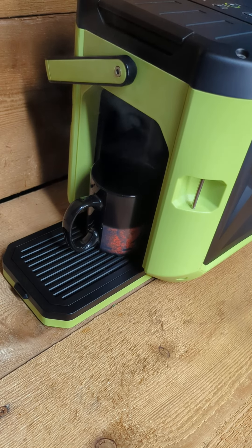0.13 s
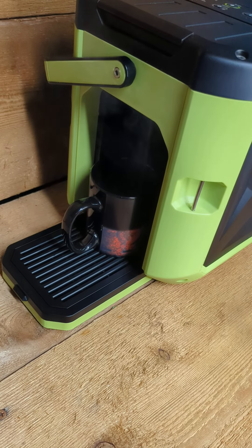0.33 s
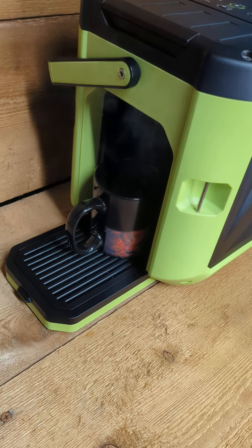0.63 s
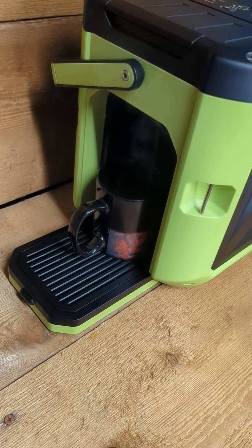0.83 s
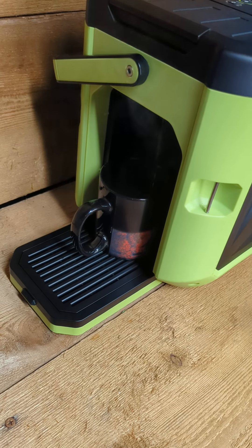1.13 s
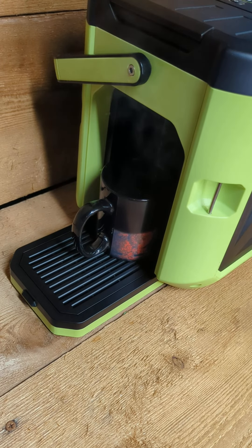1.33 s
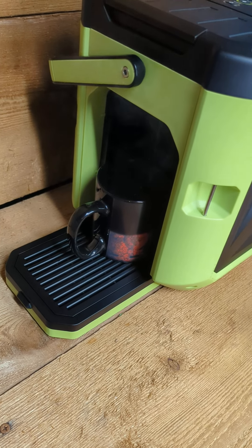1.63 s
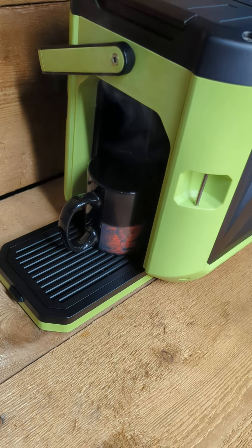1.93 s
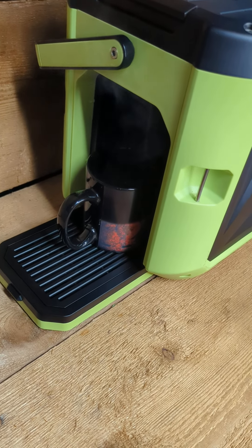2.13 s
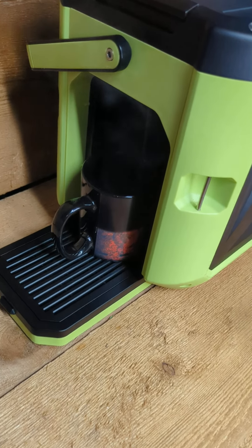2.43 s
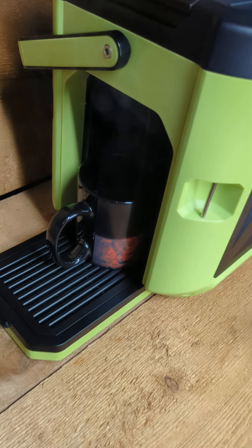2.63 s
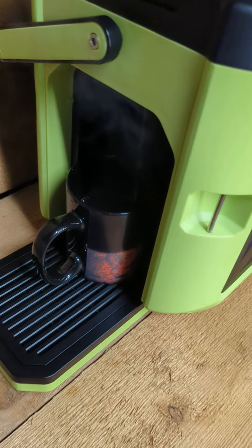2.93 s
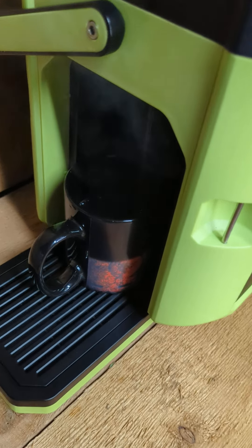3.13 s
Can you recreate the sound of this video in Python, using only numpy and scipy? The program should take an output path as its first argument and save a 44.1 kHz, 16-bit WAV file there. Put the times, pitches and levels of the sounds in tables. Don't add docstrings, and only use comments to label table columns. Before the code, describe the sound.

Close up in a wooden kitchen nook, rapid uneven drops plop and tick into a mug, thinning after the middle, then ending with louder plops; steady hum, faint whine and a brief steam hiss behind.

```python
import sys
import numpy as np
from scipy import signal
from scipy.fft import rfft, irfft
from scipy.io import wavfile
from scipy.ndimage import uniform_filter1d

SR = 44100
rng = np.random.default_rng(int(sys.argv[2]) if len(sys.argv) > 2 else 0)


def int16_out(signal):
    q = np.round(np.clip(np.atleast_2d(signal).T, -1, 1) * 32767)
    wavfile.write(sys.argv[1], SR, q.astype(np.int16))


def level_to_linear(level):
    exponent = np.asarray(level, float) / 20
    return 10 ** exponent


N = 145089
LEFT_LEAD_S = 0.000137


def evened(x):
    return x / np.sqrt(np.mean(x ** 2) + 1e-20)


def read(points, hz):
    f, value = np.transpose(points)
    return np.interp(np.log(hz + 1), np.log(f + 1), value)


def level_over_time(points):
    return level_to_linear(np.interp(np.arange(N) / SR, *np.transpose(points)))


def add(mix, s, sound):
    part = mix[..., max(round(s * SR), 0):][..., :sound.shape[-1]]
    part += sound[..., :part.shape[-1]]


def resonate(x, hz, width_hz):
    return signal.lfilter(*signal.iirpeak(min(hz, SR / 2.2), hz / width_hz, SR), x)


def slow(top_hz):
    t = np.arange(0, N + 64, 64) / SR
    wave = np.zeros(len(t))
    for f in np.geomspace(top_hz / 10, top_hz, num=16):
        wave += np.sin(2 * np.pi * (f * t + rng.random())) / np.sqrt(f)
    return np.interp(np.arange(N) / SR, t, evened(wave))


# (frequency [Hz], left-right likeness [-1 to 1])
LIKENESS = [(25, .75), (60, 1), (250, 0.71), (640, 0.4), (1400, 0.05), (3000, 0.3), (6000, .4),
            (15000, 0.35)]


def hiss(tone, patchy_db):
    frames, hz = N // 256 + 5, np.fft.rfftfreq(1024, 1 / SR)
    a, b, c, d, patches = rng.standard_normal((frames, 513, 5)).T
    patches = uniform_filter1d(patches, size=10, axis=0)
    patches = evened(uniform_filter1d(patches, size=12, axis=1))
    same = np.clip(read(LIKENESS, hz), -1, 1)[:, None]
    lag = np.exp(-2j * np.pi * hz * LEFT_LEAD_S)[:, None]
    left = a + 1j * b
    right = lag * same * left + np.sqrt(1 - same ** 2) * (c + 1j * d)
    z = np.array([left, right]) * level_to_linear(read(tone, hz)[:, None] + patchy_db * patches)
    return evened(signal.istft(z, nperseg=1024, noverlap=768)[1][:, :N])


MAINS_HZ = 59.97
# (multiple of the mains frequency [count], level [dB rms])
MAINS = [(1, -62), (2, -48.5), (4, -57), (5, -64), (6, -59), (7, -60.5), (8, -60), (9, -62), (10, -51),
         (12, -59), (13, -60), (14, -61.5), (15, -58.5), (18, -57)]


def mains_hum():
    t, out = np.arange(N) / SR, np.zeros((2, N))
    for k, db in MAINS:
        turn = 2 * np.pi * (round(k) * MAINS_HZ * t + rng.random())
        both = np.sin([turn, turn - 0.14 * round(k)])
        out += level_to_linear(db + 1.8 * slow(top_hz=10)) * np.sqrt(2) * both
    return out


# (frequency [Hz], level [dB rms], wander [Hz], throb [dB])
DRONE = [(93.2, -57.5, 1.2, -1.5), (111, -54.5, 2.67, 3), (188.1, -52, 2.2, 6.5), (222.1, -41, 0.58, 2.5)]


def motor_drone():
    out = np.zeros((2, N))
    for hz, db, wander_hz, throb_db in DRONE:
        turn = 2 * np.pi * np.cumsum(hz + wander_hz * slow(top_hz=12)) / SR
        out += level_to_linear(db + throb_db * np.tanh(slow(top_hz=14))) * np.sqrt(2) * np.sin(turn)
    return out


AIR_DB = -44.5
# (frequency [Hz], level [dB per Hz])
AIR = [(32, -27), (60, -11.5), (220, -8), (650, -15), (1600, -14.5), (2800, -17.5), (5800, -33),
       (16000, -41.5)]


def room_air():
    return level_to_linear(AIR_DB) * hiss(AIR, patchy_db=1.14)


# (frequency [Hz], width [Hz], level [dB rms])
WHINE = [(4620, 130, -66), (4500, 360, -66)]
# (time [s], level [dB])
WHINE_SWELL = [(0, 1), (.45, 0), (.56, -9), (.8, -9), (.9, 1), (1.75, 0), (1.86, -6), (1.93, 2), (2.3, -1),
               (2.46, -6), (2.58, 1), (3.0, -1), (3.07, -8), (3.2, 2)]


def heater_whine():
    raw, whine = rng.standard_normal((2, N)), np.zeros((2, N))
    for hz, width_hz, db in WHINE:
        band = resonate(resonate(raw, hz, width_hz), hz, width_hz)
        whine += level_to_linear(db + 0.83 * slow(top_hz=6.58)) * evened(band)
    return whine * level_over_time(WHINE_SWELL)


# (time [s], level [dB])
STEAM = [
    (0, -67),
    (1.0, -61),
    (1.25, -55),
    (1.45, -62),
    (2.05, -57.5),
    (2.2, -52),
    (2.33, -44.5),
    (2.39, -43),
    (2.45, -60.5),
    (3.29, -56.5),
]
# (frequency [Hz], level [dB per Hz])
STEAM_TONE = [(1500, 0), (4000, -1.5), (14000, -9)]


def steam():
    return level_over_time(STEAM) * hiss(STEAM_TONE, patchy_db=1.1)


SPLASH_LOW_HZ, SPLASH_DB = 3200, -8
SPLASH_WIDTH, SPLASH_PEAK_DB = 0.1, -6
SPLASH_TAIL_DB, SPLASH_TAIL_T60_S = -33, 0.018
PING_BELOW_HZ, PING_EXTRA_DB = 8600, 8
# (frequency [Hz], level under the splash [dB], t60 [s])
MUG_WALL = (5130, -16, .06)


def splash(db, hz, length):
    t = np.arange(0, .07, 1 / SR)
    shared, own = rng.standard_normal(len(t)), rng.standard_normal((2, len(t)))
    highpass = signal.butter(2, max(SPLASH_LOW_HZ, .5 * hz), "high", fs=SR, output="sos")
    noise = signal.sosfilt(highpass, shared + 1.1 * own)
    band = evened(resonate(noise, hz, SPLASH_WIDTH * hz))
    noise = evened(evened(noise) + level_to_linear(SPLASH_PEAK_DB) * band)
    u = t / max(length, 1e-3)
    onset = np.minimum(u, 1)
    burst = u ** 2 * np.exp(1 - u ** 2)
    tail = onset * level_to_linear(SPLASH_TAIL_DB - 60 * t / SPLASH_TAIL_T60_S)
    wall_hz, wall_db, t60 = MUG_WALL
    ping_db = wall_db + PING_EXTRA_DB * (hz < PING_BELOW_HZ)
    ping = level_to_linear(ping_db - 60 * t / t60) * onset * np.sin(2 * np.pi * wall_hz * t)
    return level_to_linear(db + SPLASH_DB) * (noise * (burst + tail) + ping)


SPRAY_PER_S, SPRAY_DB, SPRAY_SPREAD_DB = 60, -53, 2
# (time [s], peak level [dB], brightest
# frequency [Hz], length [s])
SPLASHES = [(0.067, -35.5, 9000, 0.0027), (0.158, -38, 12900, 0.0023), (0.319, -32, 11800, 0.0026),
            (0.3815, -42, 8520, 0.003), (0.4344, -31, 11800, 0.0025), (0.4673, -38, 7000, 0.0022),
            (0.516, -39, 5160, 0.0023), (0.5896, -32, 7500, 0.0024), (0.647, -30.5, 12900, 0.0028),
            (0.6814, -30.5, 11600, 0.0021), (0.7592, -31.5, 14500, 0.0028),
            (0.9213, -36.5, 8000, 0.003), (1.002, -42, 5370, 0.0024), (1.013, -32.5, 12700, 0.004),
            (1.1104, -38, 12600, 0.0022), (1.1852, -36, 11900, 0.003), (1.238, -38, 13000, 0.003),
            (1.26, -27, 11900, 0.0021), (1.286, -25.5, 12000, 0.0026), (1.3274, -34, 6000, 0.0025),
            (1.5349, -40, 14800, 0.0032),
            (1.6931, -39.5, 8000, 0.0025), (1.725, -40, 12500, 0.003), (1.772, -30, 6500, 0.0024),
                 (1.8478, -36, 14100, 0.0026), (1.874, -36, 8500, 0.0026), (1.917, -26.5, 5200, 0.0019),
                 (2.2119, -33.5, 10900, 0.0034), (2.2833, -35, 13200, 0.003), (2.3107, -35, 7040, 0.0039),
                 (2.485, -27.5, 13000, 0.0024), (2.631, -35, 14600, 0.0033), (2.6816, -36.5, 8000, 0.0026),
                 (2.758, -34, 14000, 0.0033), (2.8305, -37, 6700, 0.002),
            (2.909, -40, 6700, .003), (2.921, -29, 14100, .0025), (2.9585, -29, 14600, .003),
                 (3.009, -31, 9300, .0025), (3.0785, -36, 8000, .0025), (3.223, -22, 9500, .0022),
                 (3.2715, -23, 13600, .003), (3.2745, -25, 5300, .002),
            (.1092, -41, 11500, .002), (.4953, -43, 6800, .002), (.5472, -41, 12900, .002),
                  (.567, -41, 13500, .002), (.751, -36, 11000, .0025), (.94, -39, 13500, .0025),
                  (.956, -39, 11000, .0025), (1.06, -42, 12000, .002), (1.1565, -41, 12100, .002),
                  (1.2055, -42, 14300, .002), (1.27, -32, 12500, .002), (1.4636, -43, 12000, .002),
                  (1.6242, -44, 8300, .002), (1.78, -34, 12000, .002), (1.8008, -40, 9000, .002),
                  (1.933, -41, 6500, .002), (1.983, -43, 13000, .002), (2.1445, -42, 11300, .002),
                  (2.5481, -45, 13000, .002), (2.6045, -44, 7000, .002), (2.6993, -41, 12000, .002),
                  (2.8355, -36, 12500, .002), (2.848, -36, 13500, .002), (3.022, -41, 7000, .002),
                  (3.048, -41, 7000, .002), (3.1333, -44, 9000, .002), (3.1956, -44, 6860, .002)]


def splashes():
    out = np.zeros((2, N))
    for s, db, hz, length in SPLASHES:
        add(out, s - .0015, splash(db, hz, length))
    for s, size, pitch in rng.random((round(SPRAY_PER_S * N / SR), 3)):
        db = SPRAY_DB - SPRAY_SPREAD_DB * np.log(size + 0.022)
        add(out, s * N / SR, splash(db, 7000 + 8000 * pitch, 0.0016))
    return out


PLOP_RISE_S, PLOP_T60_S, PLOP_GLIDE = 0.0006, 0.0075, 0.047


def bubble(hz, hold, t60, glide=PLOP_GLIDE):
    t = np.arange(0, .08, 1 / SR)
    rise = np.sin(np.pi / 2 * np.minimum(t / PLOP_RISE_S, 1)) ** 2
    decay = level_to_linear(-60 * np.maximum(t - hold, 0) / t60)
    pitch = hz * (1 + glide * np.tanh(t / 0.0044 - 1))
    return rise * decay * np.sin(2 * np.pi * np.cumsum(pitch) / SR)


PLINK_T60_S, PLINK_SAG = .11, -.01
# (time [s], peak level [dB], frequency [Hz])
PLINKS = [
    (2.057, -46, 3350),
    (2.8045, -34, 3320),
]


def plinks():
    out = np.zeros((2, N))
    for s, db, hz in PLINKS:
        short = bubble(1.02 * hz, .002, .012, 4 * PLINK_SAG)
        long = bubble(hz, .001, PLINK_T60_S, PLINK_SAG)
        add(out, s, level_to_linear(db) * (short + .25 * long))
    return out


def ring(x, modes):
    out = x.copy()
    for hz, db, t60 in modes:
        out += level_to_linear(db) * resonate(x, hz, 6.6 / t60) * np.sqrt(t60 * hz / 10)
    return out


PLOP_DB, KNOCK_DB = -8, -1.5
PLOP_HOLD_S, HOLD_S_PER_DB = .002, .0001
TRICKLE_PER_S, TRICKLE_DB, TRICKLE_SPREAD_DB = 50, -44, 3
# (time [s], peak level [dB], bubble frequency [Hz])
PLOPS = [(.109, -32.5, 1110), (.142, -34, 1080), (.191, -32, 1560), (.293, -33, 1520),
         (.332, -33, 1000), (.434, -31, 1500), (.497, -28, 1470), (.547, -23.5, 1250),
         (.59, -27, 1550), (.648, -26, 1430), (.663, -25, 1420), (.927, -30, 1520), (1.0, -27, 1500),
         (1.045, -23, 1390), (1.138, -33, 1600), (1.196, -31, 1000), (1.23, -31.5, 1150),
         (1.26, -21, 1520), (1.27, -27, 1400), (1.286, -26, 1300),
         (1.703, -31, 1500), (1.774, -26, 1475), (1.815, -33, 1070), (1.857, -35, 1020),
              (1.89, -28.5, 1050), (1.934, -29, 1250), (2.106, -28, 1350), (2.263, -35, 1090),
              (2.294, -27, 1500), (2.315, -34, 1570), (2.485, -27, 1180), (2.504, -26, 1200),
              (2.831, -27, 1250), (2.849, -37, 1130), (2.914, -34, 1630), (2.993, -28.5, 961),
              (3.01, -23.5, 1000), (3.024, -32, 921), (3.098, -32, 1200), (3.133, -29, 1370),
              (3.224, -16.5, 1553),
         (.066, -38, 1430), (.167, -34, 1040), (.318, -36, 1350), (.773, -37, 1010), (.854, -34, 991),
               (.9, -35, 1530), (1.06, -31, 1050), (1.1, -37, 1610), (1.24, -32, 1050), (1.368, -34, 991),
               (1.411, -36, 1560), (1.435, -36, 1500), (.38, -35, 1500), (.715, -35, 1480),
               (1.985, -35, 1500), (2.215, -36, 1550), (1.691, -37, 1680), (1.835, -36, 1500),
               (2.089, -33, 1470), (2.145, -36, 1500), (2.188, -38, 1500), (2.24, -36, 972),
               (2.395, -35, 900), (2.766, -38, 1000), (2.804, -34, 1160), (3.078, -33, 1440),
               (3.271, -36, 1180)]
# (frequency [Hz], level [dB], t60 [s])
MUG_AIR = [(1000, -8, .04), (1040, -14, 0.14), (1150, -17, 0.12), (1520, -8, 0.035)]


def plops():
    out, t = np.zeros(N), np.arange(0, .0019, 1 / SR)
    knock = level_to_linear(KNOCK_DB) * np.hanning(len(t)) * np.sin(2 * np.pi * 1250 * t)
    for s, db, hz in PLOPS:
        hold = PLOP_HOLD_S + HOLD_S_PER_DB * (db + 30)
        start = s - PLOP_RISE_S / 2
        add(out, start, level_to_linear(db + PLOP_DB) * bubble(hz, hold, PLOP_T60_S))
        add(out, start, level_to_linear(db + PLOP_DB) * knock)
    for s, size, pitch in rng.random((round(TRICKLE_PER_S * N / SR), 3)):
        db = TRICKLE_DB - TRICKLE_SPREAD_DB * np.log(size + .45)
        add(out, s * N / SR, level_to_linear(db) * bubble(950 + 700 * pitch, .001, PLOP_T60_S))
    out = ring(out, MUG_AIR)
    return np.array([out, np.roll(out, round(LEFT_LEAD_S * SR))])


NOOK_T60_S, NOOK_DB, SPLASH_NOOK_DB = 0.075, -7, -11


def nook(x):
    t = np.arange(0, .15, 1 / SR)
    signs = rng.choice([-1., 1.], (2, len(t)))
    sparse = rng.random((2, len(t))) < .06
    taps = signs * sparse * level_to_linear(-60 * t / NOOK_T60_S) * (t > .002)
    taps = taps / np.linalg.norm(taps, axis=1, keepdims=True)
    return signal.fftconvolve(x, taps, axes=1)[:, :N]


def scene():
    background = mains_hum() + motor_drone() + room_air() + heater_whine() + steam()
    high = splashes()
    low = plinks() + plops()
    echoes = nook(level_to_linear(NOOK_DB) * low + level_to_linear(SPLASH_NOOK_DB) * high)
    return background + high + low + echoes


EDGE_HZ = 15920
# (frequency [Hz], left over right [dB])
PORTS = [(200, 0), (380, -1.5), (1300, 4), (2400, -.5), (5000, -2), (9000, -4.5), (13500, 6)]
# (frequency [Hz], level [dB])
MIC = [(3900, 0.5), (4120, -2), (4350, 2.5), (5200, 1.5), (5800, -1), (7300, 1), (10200, -1.5), (11800, 1)]


def phone_microphone(x):
    hz = np.fft.rfftfreq(N, 1 / SR)
    treble_edge = np.clip((EDGE_HZ - hz) / 300, .015, 1)
    bass_edge = 1 / (1 + (38 / (hz + 1)) ** 6)
    colour = level_to_linear(np.outer([.5, -.5], read(PORTS, hz)) + read(MIC, hz))
    return irfft(rfft(x) * treble_edge * bass_edge * colour, N)


def low_pass(x):
    return signal.sosfilt(signal.butter(12, 16820, fs=SR, output="sos"), x)


def record(dry):
    mix = phone_microphone(dry)
    return low_pass(mix)


dry = scene()
out = record(dry)
int16_out(out)
```